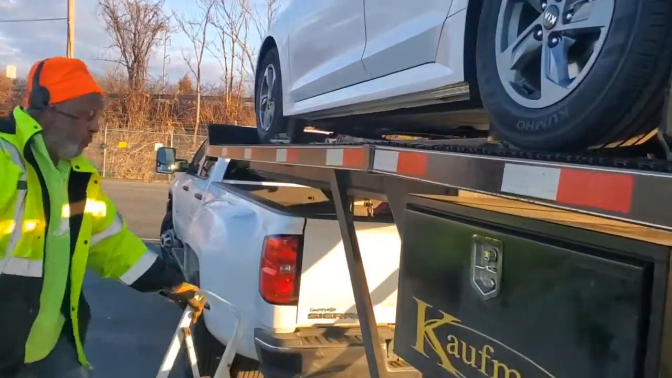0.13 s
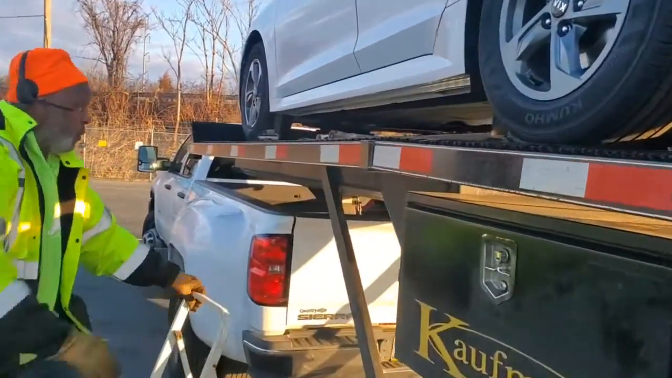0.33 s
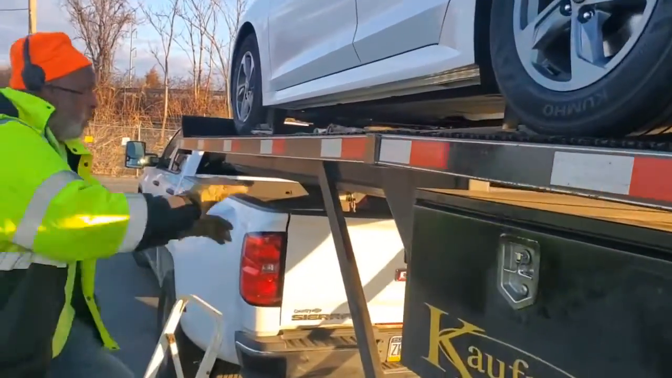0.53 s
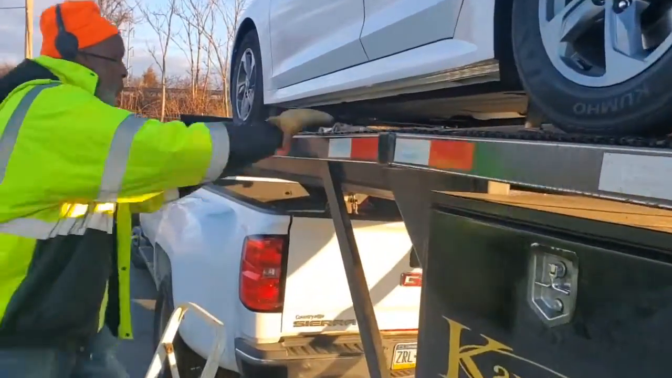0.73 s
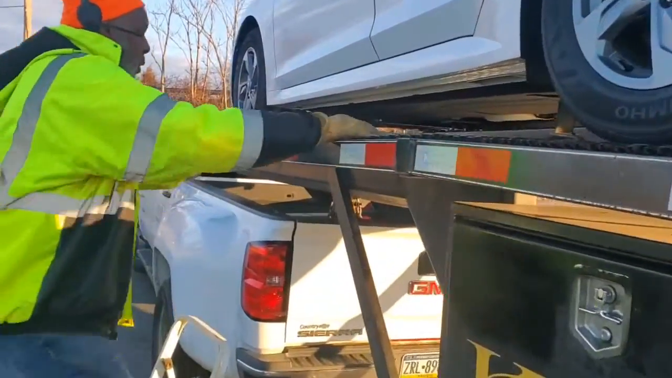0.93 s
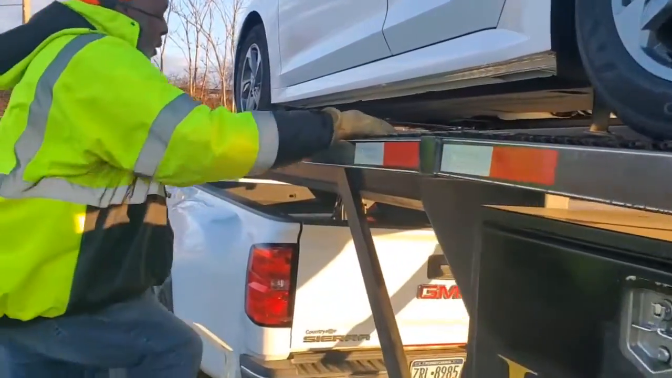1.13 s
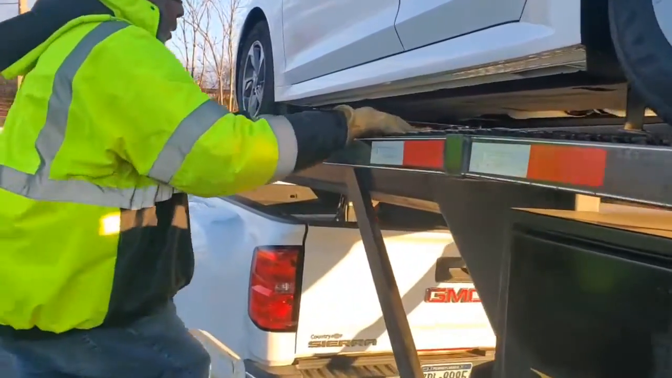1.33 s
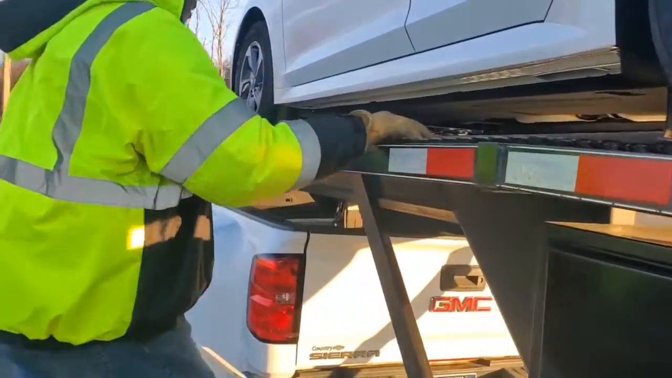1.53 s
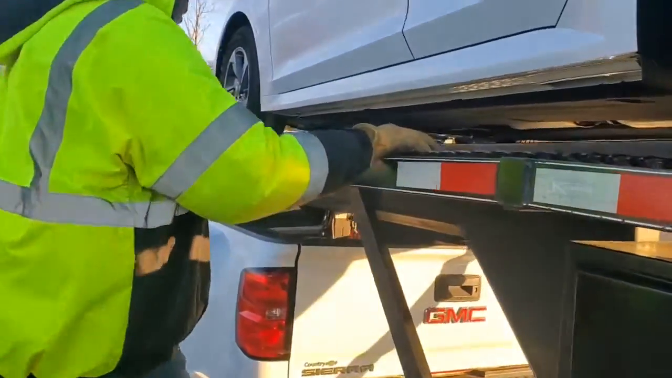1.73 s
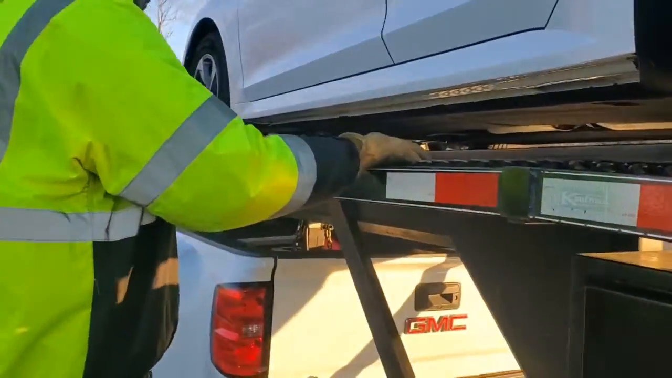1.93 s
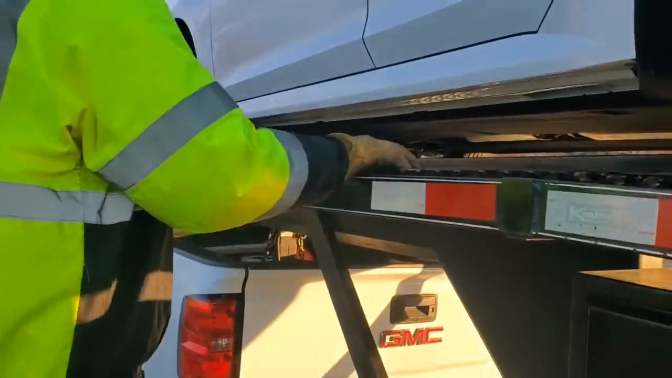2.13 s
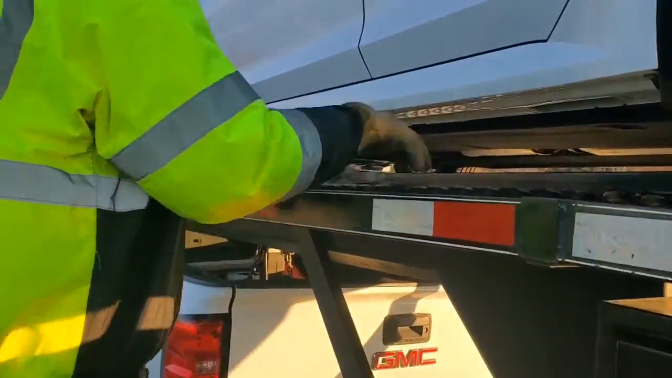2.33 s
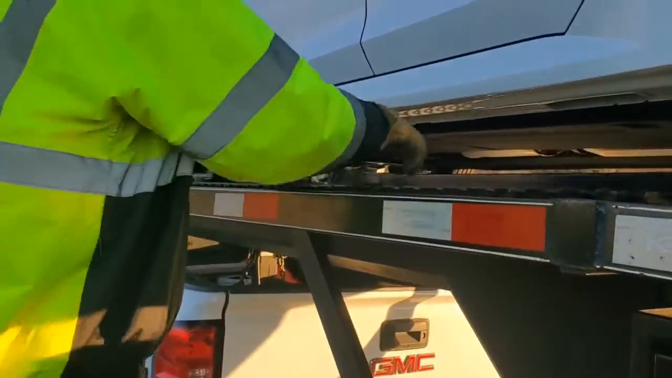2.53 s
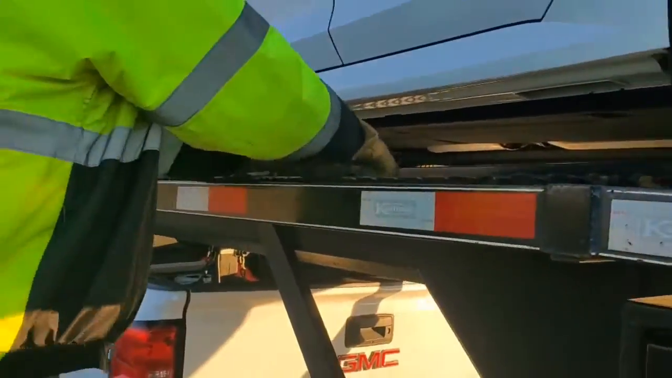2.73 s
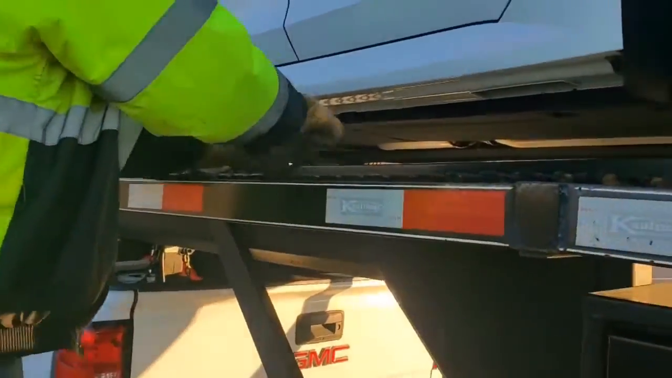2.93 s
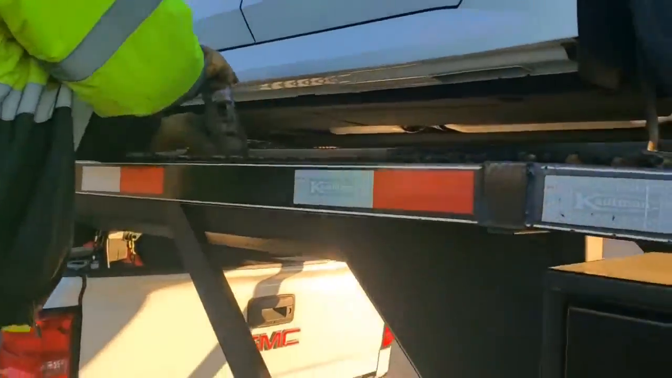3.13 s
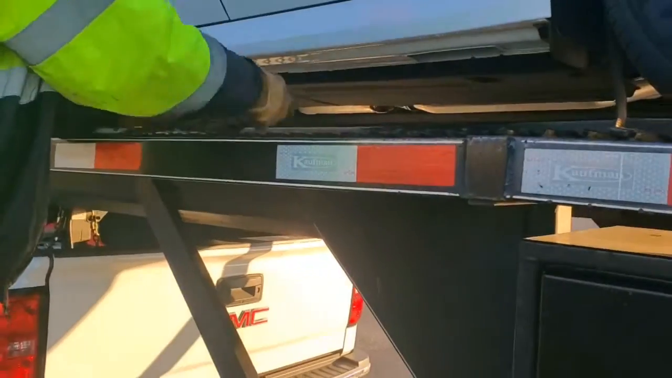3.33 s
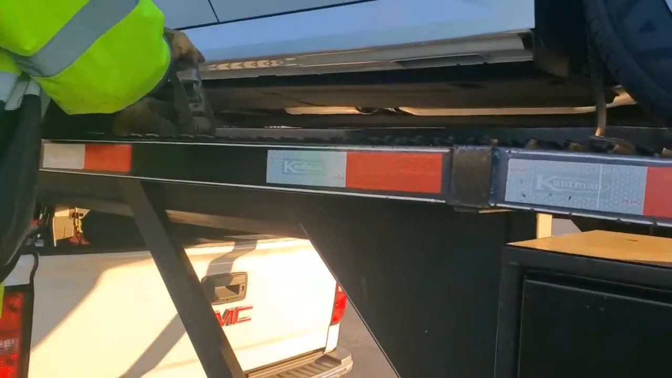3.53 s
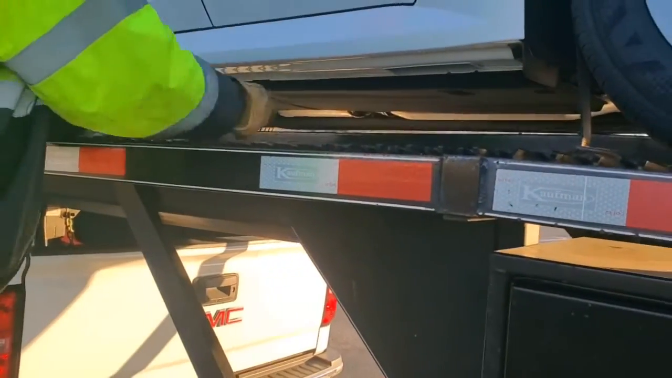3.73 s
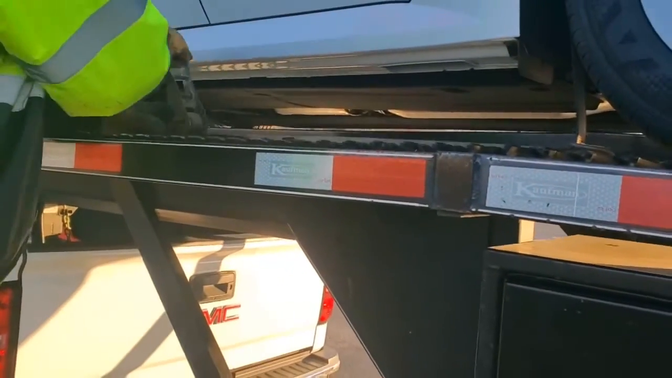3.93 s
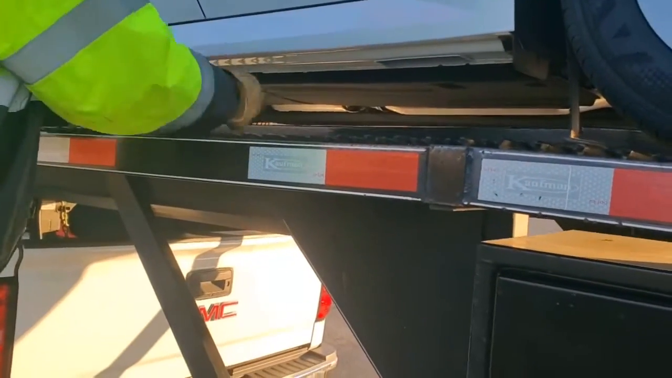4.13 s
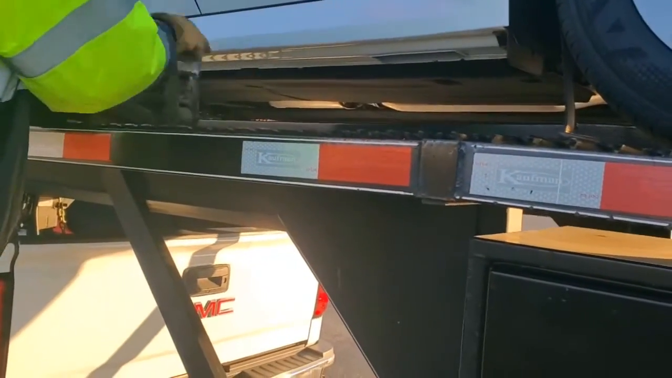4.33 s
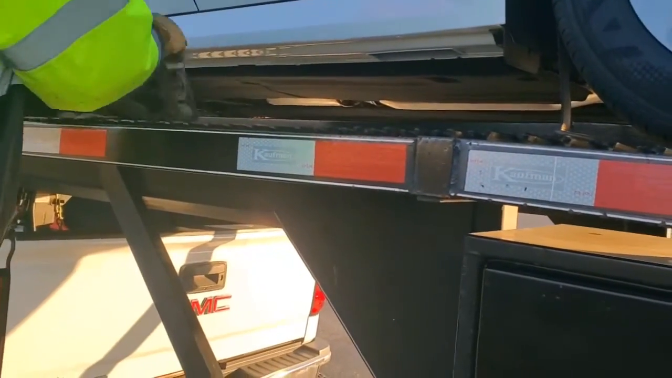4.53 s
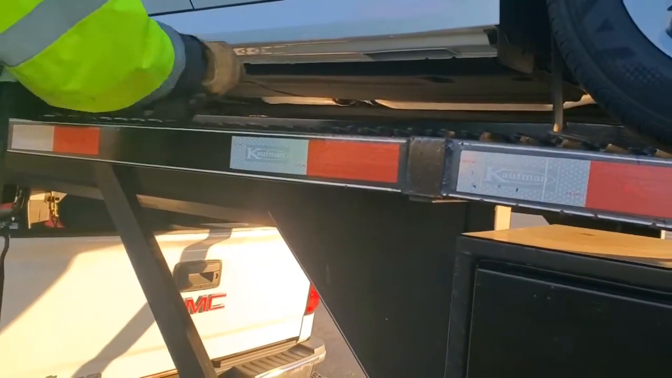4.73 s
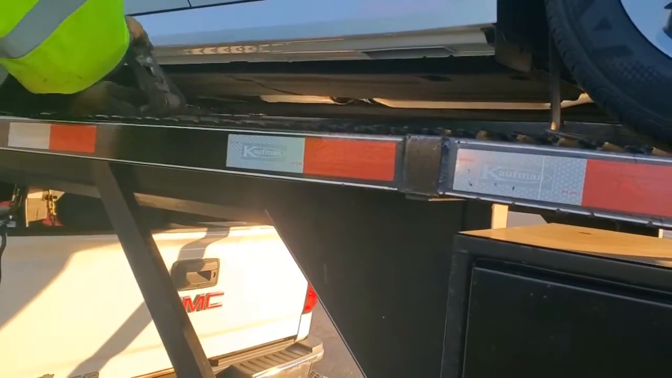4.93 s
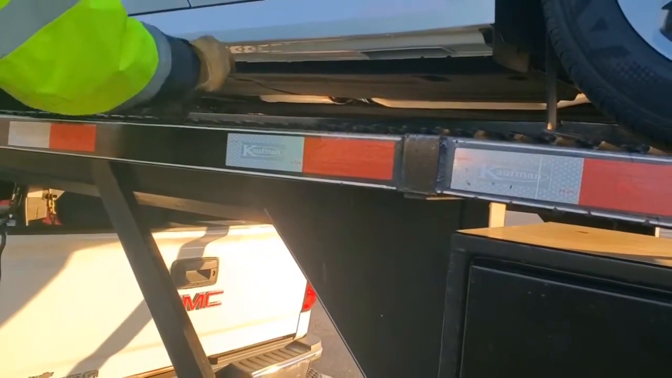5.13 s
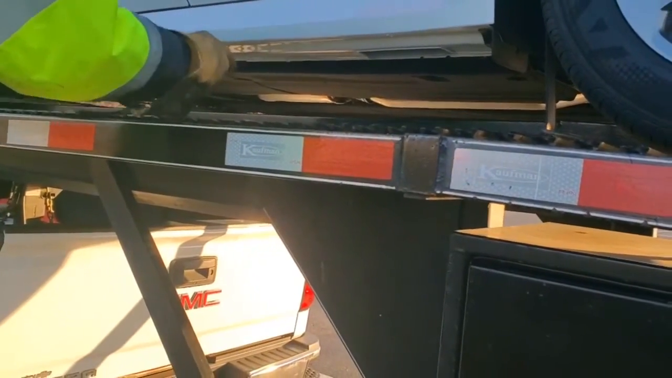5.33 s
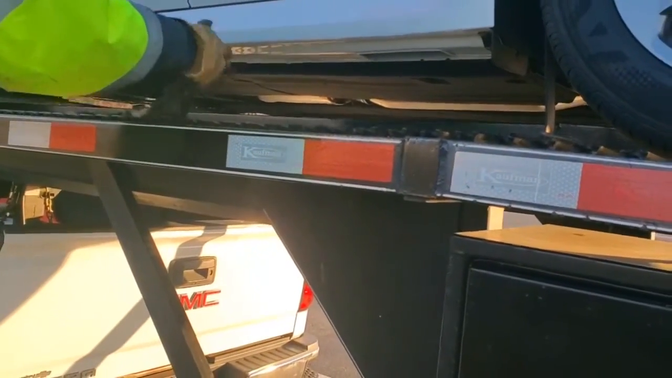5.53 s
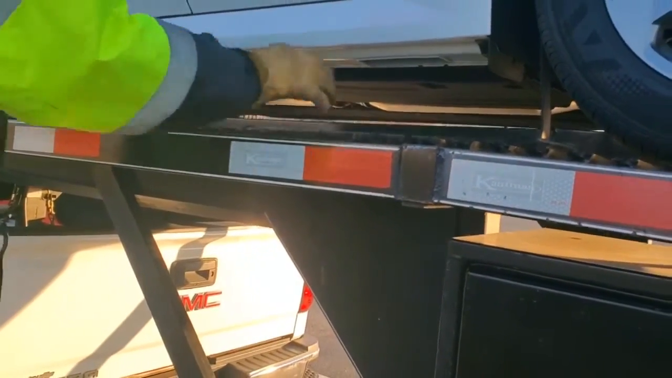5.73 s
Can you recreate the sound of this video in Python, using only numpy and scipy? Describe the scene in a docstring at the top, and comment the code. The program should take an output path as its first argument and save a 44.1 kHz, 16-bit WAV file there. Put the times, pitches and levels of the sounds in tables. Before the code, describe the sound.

Outdoors in low wind, a stool drags with a squeak before a strap ratchet is cranked with sharp clicks and ringing knocks.

```python
"""Outdoors beside a steel car trailer. An aluminium step stool is dragged over asphalt: its feet rasp
and squeak, its frame rings, its legs clack. Then a tie-down ratchet is cranked: ratchet and hook scrape,
knock and rattle on the ringing deck, and the sprung pawl snaps over its teeth.
A work jacket rustles; wind rumbles on the microphone over distant traffic."""
import sys
import numpy as np
from scipy import signal
from scipy.fft import rfft, irfft
from scipy.io import wavfile
from scipy.ndimage import uniform_filter1d

SR = 44100
rng = np.random.default_rng(int(sys.argv[2]) if len(sys.argv) > 2 else 0)


def log_audio(samples):
    """Write samples as a 16-bit WAV file to the path given in sys.argv[1]."""
    # one column per channel
    frames = np.atleast_2d(samples).T
    # limit to full scale, then quantise
    limited = np.clip(frames, -1, 1)
    pcm = np.round(limited * 32767).astype(np.int16)
    wavfile.write(sys.argv[1], SR, pcm)


N = 254456
HIT_N = 24576  # samples per hit
T = np.arange(N) / SR
HIT_T = T[:HIT_N]

# stool shoves (time [s], length [s], level [dB], treble [dB re level])
SHOVES = [(-.008, 0.015, -13.5, -1), (0.041, 0.061, -22.5, -4), (0.108, 0.1, -20, -5),
          (0.216, 0.12, -27.5, -24), (0.408, 0.048, -34.5, -9), (0.452, 0.015, -39.5, -2)]
# stool frame modes (frequency [Hz], bandwidth [Hz], level [dB])
STOOL_MODES = [(733, 61, -4), (1197, 280, 3.5), (1720, 31, -3), (1940, 34, 4), (2224, 35, 9),
               (2390, 66, -2), (2720, 50, -7), (2870, 48, 2), (3370, 59, 7), (4265, 42, 8)]
# grit under the feet (frequency [Hz], level [dB])
GRIT_SPECTRUM = [(120, -53), (200, -6), (435, -13), (748, 0), (1380, -11.5), (1690, -1.5), (2330, -7.5),
                 (2850, 1.5), (7420, -9.5), (11200, -17), (15000, -32)]
# bright crack of stool and pawl (frequency [Hz], level [dB])
CRACK_SPECTRUM = [(1500, -1.5), (3500, 3), (6000, 4.5), (7700, 1.5), (10000, 7.5), (12500, 4.5),
                  (14500, -5), (16000, -9.5)]
# leg clacks (time [s], level [dB], crack [dB re level])
CLACKS = [(.016, -26, 2), (.177, -20, -12), (0.296, -22.5, -14), (.313, -23, -1), (0.534, -49, -14)]
# stool squeaks (time [s], length [s], start pitch [Hz], end pitch [Hz], level [dB])
SQUEAKS = [(.005, 0.045, 1715, 1895, -26.5), (0.121, 0.017, 2940, 1500, -24),
           (0.178, 0.092, 1722, 1735, -31.5), (0.192, 0.058, 2770, 2760, -32),
           (0.257, 0.022, 2610, 2800, -32), (0.43, 0.01, 2220, 2210, -32.5), (0.77, 0.37, 2290, 2360, -66),
           (0.798, 0.3, 2790, 3060, -66)]
# wind strength (time [s], level [dB])
WIND_LEVELS = [(0.0, -40.5), (1.36, -38), (1.6, -33), (3.3, -32.5), (4.3, -35), (5.1, -34.5), (5.6, -35)]
# deep wind rumble (frequency [Hz], level [dB])
RUMBLE_SPECTRUM = [(15, -20), (32, -13), (48, -3), (64, 2), (96, -1), (130, -9), (200, -19), (400, -50),
                   (1600, -90)]
# upper wind rumble (frequency [Hz], level [dB])
STIR_SPECTRUM = [(90, -25), (135, 5.5), (170, 8), (260, 2), (400, -5), (800, -100)]
# wind buffets (time [s], level [dB])
BUFFETS = [(1.667, -21.5), (2.05, -25), (2.708, -21), (2.969, -25), (4.601, -19.5), (5.012, -21.5)]
# far traffic (frequency [Hz], level [dB])
TRAFFIC_SPECTRUM = [(150, -7.5), (350, 4), (650, 3.5), (1000, -1.5), (2000, -8), (4000, -19.5), (8000, -55)]
# jacket cloth (frequency [Hz], level [dB])
CLOTH_SPECTRUM = [(700, -29), (2500, 4.5), (6500, 8.5), (7800, 3), (12000, 4.5), (16000, 0.5)]
# arm reaches (centre [s], sigma [s], level [dB])
REACHES = [(1.05, 0.044, -69), (2.452, 0.4, -61.5)]
# hook and ratchet drags (time [s], length [s], level [dB], clash [dB re level])
SCRAPES = [(1.219, 0.035, -45.5, -6), (2.661, 0.077, -41, -29), (2.718, 0.035, -36.5, -7),
           (2.835, 0.057, -38.5, -13), (3.634, 0.088, -33.5, -5.5), (4.19, 0.1, -33, -8),
           (4.751, 0.04, -38.5, 1), (5.58, 0.048, -41, -21.5)]
# dense deck modes (frequency [Hz], level [dB], t60 [s])
DECK_BANDS = [(146, -6, 0.93), (337, -4.5, 1), (550, -1, 1), (1060, 2, 0.7), (1690, -4, 0.84),
              (2300, -6, 0.62), (4200, -14.5, 0.95), (9050, -26.5, 0.49)]
# clash of steel parts (frequency [Hz], level [dB], t60 [s])
CLASH_BANDS = [(940, -14, 0.142), (2220, 7, 0.51), (4300, 5, 0.38), (7950, -1, 0.3), (11400, -3, 0.32),
               (16000, -10, 0.057)]
# knocks on the deck (time [s], level [dB], clash [dB re level], build-up [s])
KNOCKS = [(1.236, -45.5, 2.5, 0.0014), (1.362, -51, -9, 0), (1.427, -51, 2.5, 0), (2.019, -35, -23, 0),
          (2.074, -35, -28, 0), (2.255, -33.5, -24, 0), (2.754, -29.5, -17, 0), (2.83, -27.5, -22, 0.0011),
          (2.901, -21.5, -19, 0), (3.194, -15.5, -9, 0.0028), (3.298, -14.5, -25, 0.0028),
          (3.335, -16, -11, 0.01), (3.37, -14, -19, 0.0038), (3.427, -12, -7.5, 0.0042),
          (3.712, -11, -8, 0.016), (3.817, -15, -5.5, 0.004), (4.002, -14, -11, 0.0033),
          (4.1, -17.5, -7, 0.019), (4.135, -19.5, -13.5, .006), (4.242, -21.5, -9, 0.005),
          (4.481, -19.5, -8.5, 0.017), (4.614, -23, -11, 0.012), (4.656, -13, -12, 0.014),
          (5.002, -13.5, -9, 0.013), (5.102, -23.5, -0.5, 0.0016), (5.174, -26.5, 2, 0.0036)]
# clearest deck modes (frequency [Hz], t60 [s], level [dB])
DECK_MODES = [(420, .9, 4), (448, .8, 3), (538, .6, 5), (651, .6, 6), (824, .6, 5), (964, .5, 7),
              (1010, .3, 5), (1110, .4, 2), (1233, .3, 2), (1663, .5, -1), (1997, .5, -2), (2400, .5, 0),
              (4450, .35, -7)]
# steel grinding under load (frequency [Hz], level [dB])
GRIND_SPECTRUM = [(450, -35), (1000, 7.5), (2200, -7.5), (5000, -24)]
# modes of the beam under the ratchet (frequency [Hz])
BEAM_HZ = [450, 560, 680, 830, 990, 1200, 1500]
# hook modes (frequency [Hz])
HOOK_HZ = [1863, 2358, 3112, 3521, 4091, 5103]
# pawl snaps (time [s], level [dB], favoured mode [Hz], its ring [dB re level])
SNAPS = [(3.0399, -5, 12600, -15), (3.0852, -3.5, 11650, -12), (3.265, -7, 14490, -11),
         (3.318, -10, 11650, -10), (3.6632, -23.5, 11650, -16), (3.711, -7, 14490, 5.5),
         (4.057, -22, 11650, -19), (4.111, -11, 13250, -7), (4.361, -10.5, 11650, -13),
         (4.4424, -24, 8550, -9), (4.4874, -35, 14490, -1), (4.613, -7, 14490, 5.5),
         (4.656, -10.5, 13250, -7), (4.8752, -6.5, 11650, 0.5), (4.929, -15.5, 11650, -17),
         (5.102, -8.5, 13250, -5)]
# pawl and spring modes (frequency [Hz], t60 [s], level [dB])
PAWL_MODES = [(5800, .06, -6), (6900, .06, -6), (8550, .05, -6), (10000, .05, -6), (11650, .045, -2),
              (12600, .04, -3), (13250, .04, -3), (14490, .04, -3)]
# ratchet frame (frequency [Hz], level [dB], t60 [s])
RATCHET_BANDS = [(686, -17, 0.14), (2360, 4.5, 0.22), (4400, 8.5, 0.18), (7260, 1, 0.14)]
# left-right likeness (frequency [Hz], correlation [-])
CORRELATION = [(40, 0.89), (130, 0.24), (300, 0.67), (750, 0.7), (1400, 0.09), (2800, 0.28), (5000, 0.17),
               (12000, 0.038)]


def undb(db):
    """Decibels to gain."""
    return 10 ** (np.asarray(db) / 20)


def unit(x):
    """Scale to rms 1."""
    return x / np.sqrt(np.mean(x ** 2))


def unit_peak(x, size=256):
    """Scale the loudest window to rms 1."""
    return x / np.sqrt(uniform_filter1d(np.mean(x ** 2, axis=0), size).max())


def at_hz(hz, rows):
    """Interpolate a table's second column over log frequency."""
    rows = np.array(rows)
    return np.interp(np.log(hz + 1e-9), np.log(rows[:, 0]), rows[:, 1])


def noise(spectrum, size=HIT_N):
    """Shaped stereo noise, rms 1; the sides are nearly unrelated in the treble."""
    hz = np.fft.rfftfreq(size, 1 / SR)
    alike = at_hz(hz, CORRELATION)
    mid, side = rfft(rng.standard_normal((2, size))) * np.sqrt([1 + alike, 1 - alike])
    return unit(irfft(np.array([mid + side, mid - side]) * undb(at_hz(hz, spectrum)), size))


def wander(rate_hz):
    """Random curve, spread near 1."""
    return np.interp(T * rate_hz, np.arange(1024), rng.standard_normal(1024))


def bell(centre_s, sigma_s):
    """Gaussian rise and fall."""
    return np.exp(-.5 * ((T - centre_s) / sigma_s) ** 2)


def fade(t60_s):
    """Free decay."""
    return np.exp(-np.log(1000) * HIT_T / max(t60_s, 1e-3))


def grains(rate_hz, t60_s, size=HIT_N):
    """Jagged envelope of tiny uneven catches, rms 1."""
    catches = (rng.random(size) < rate_hz / SR) * rng.exponential(1, size)
    power = irfft(rfft(catches) * rfft(fade(t60_s) ** 2, size), size)
    return unit(np.sqrt(np.abs(power)))


def detuned(hz, spread):
    """Random relative pitch offset."""
    return hz * (1 + spread * rng.standard_normal())


def ring(modes, width=1, size=HIT_N):
    """Decaying sine modes; width scales the left-right phase gap."""
    out = 0
    for hz, t60_s, db in modes:
        gap_rad = width * np.arccos(at_hz(hz, CORRELATION)) * rng.choice([-.5, .5])
        phase = rng.uniform(0, 2 * np.pi) + np.array([[gap_rad], [-gap_rad]])
        out = out + undb(db) * fade(t60_s)[:size] * np.sin(2 * np.pi * hz * HIT_T[:size] + phase)
    return unit_peak(out)


def wash(bands, bloom_t60_s=0, bloom_hz=490):
    """Dense modes as decaying noise bands; in a large plate those below bloom_hz swell slowest."""
    source = rfft(noise(bands))
    hz = np.fft.rfftfreq(HIT_N, 1 / SR)
    centres_hz = [row[0] for row in bands]
    out = 0
    for pick, (centre_hz, _, t60_s) in zip(np.eye(len(bands)), bands):
        band = irfft(source * at_hz(hz, list(zip(centres_hz, pick))), HIT_N)
        swell = 1 - fade(bloom_t60_s * min(bloom_hz / centre_hz, 1) ** 2)
        out = out + band * swell * fade(t60_s)
    return unit_peak(out)


def excite(body, force):
    """Drive a stereo impulse response, scaled to unit energy per side."""
    return signal.fftconvolve(force[None], body / np.sqrt(np.sum(body ** 2) / 2), axes=1)


def add(out, time_s, sound):
    """Mix a sound in at a time."""
    start = max(int(time_s * SR), 0)
    out[:, start:start + sound.shape[1]] += sound[:, :out.shape[1] - start]


def shove(time_s, length_s, attack_s=.015, sag_db_per_s=33.5, release_db_per_s=351):
    """Force envelope: the feet bite, ease while sliding, stop."""
    age_s = np.maximum(T - time_s, 0)
    fall_db = sag_db_per_s * age_s + release_db_per_s * np.maximum(age_s - length_s, 0)
    return np.minimum(age_s / attack_s, 1) * undb(-fall_db)


def stool_drag(frame_db=-3, rasp_db=-1, crunch_db=-3, flex_s=4e-5):
    """Feet catch on asphalt grains; the slips rasp and ring the hollow frame, which wavers as it flexes."""
    force = sum(undb(db) * shove(s, length_s) for s, length_s, db, _ in SHOVES)
    treble = sum(undb(db + treble_db) * shove(s, length_s) for s, length_s, db, treble_db in SHOVES)
    grain = grains(rate_hz=2800, t60_s=.013, size=N)
    slips = rng.standard_normal(N) * grain * force * undb(frame_db)
    modes = [(hz, np.log(1000) / np.pi / width_hz, db + 10 * np.log10(width_hz))
             for hz, width_hz, db in STOOL_MODES]
    frame = excite(ring(modes), slips)[:, :N]
    warped_s = T + flex_s * wander(69.2)
    frame = np.array([np.interp(warped_s, T, side) for side in frame])
    rasp = noise(GRIT_SPECTRUM, N) * force * undb(rasp_db)
    crunch = noise(CRACK_SPECTRUM, N) * treble * undb(crunch_db)
    return (rasp + crunch) * grain + frame


def stool_squeaks(waver=.0355, steady_after_s=.026):
    """Slips lock on to a pitch; longer squeaks are steadier."""
    out = np.zeros((2, N))
    for time_s, length_s, start_hz, end_hz, db in SQUEAKS:
        progress = np.linspace(0, 1, int(length_s * SR))
        wobble = waver * min(1, steady_after_s / length_s) * wander(175)[:len(progress)]
        hz = (start_hz + (end_hz - start_hz) * progress) * (1 + wobble)
        phase = 2 * np.pi * np.cumsum(hz) / SR + np.array([[0], [1]])
        envelope = np.sqrt(2 * np.abs(np.sin(np.pi * progress)))
        add(out, time_s, undb(db) * envelope * np.sin(phase))
    return out


def stool_clacks(t60_s=.1):
    """The legs clack in short noise bursts."""
    out = np.zeros((2, N))
    for time_s, db, crack_db in CLACKS:
        clack = noise(GRIT_SPECTRUM) + undb(crack_db) * noise(CRACK_SPECTRUM)
        add(out, time_s, undb(db) * clack * fade(t60_s))
    return out


def wind(rumble_db=-1, stir_db=-10.5, flutter_db=6, lull_db=3, buffet_sigma_s=.0065):
    """Fluttering rumble; each large eddy shoves the microphone for a few cycles."""
    gust_db = np.interp(T, *np.transpose(WIND_LEVELS))
    gust_db += flutter_db * np.tanh(wander(36)) + lull_db * np.tanh(wander(11))
    rumble = undb(rumble_db) * noise(RUMBLE_SPECTRUM, N)
    stir = undb(stir_db) * noise(STIR_SPECTRUM, N)
    out = undb(gust_db) * (rumble + stir)
    for time_s, db in BUFFETS:
        hz = rng.uniform(79, 104)
        phase = 2 * np.pi * hz * (T - time_s) + rng.uniform(-.99, 1, (2, 1))
        out += undb(db) * bell(time_s, buffet_sigma_s) * np.sin(phase)
    return out


def traffic(base_db=-48, swell_db=4.5):
    """Distant road noise that swells once."""
    swell = bell(centre_s=2.25, sigma_s=.22)
    return noise(TRAFFIC_SPECTRUM, N) * undb(base_db + swell_db * swell + wander(12))


def jacket(floor_db=-64):
    """Cloth hisses faintly and rustles as the arm reaches out."""
    motion = undb(floor_db) + sum(undb(db) * bell(s, sigma_s) for s, sigma_s, db in REACHES)
    return noise(CLOTH_SPECTRUM, N) * motion * undb(wander(26))


def hook_scrapes(catch_rate_hz=280, damping_t60_s=.1):
    """Hook and ratchet drag over the deck; irregular catches ring the steel."""
    out = np.zeros((2, N))
    for time_s, length_s, db, clash_db in SCRAPES:
        caught = (rng.random(HIT_N) < catch_rate_hz / SR) * (HIT_T < length_s)
        catches = caught * rng.standard_normal(HIT_N)
        catches *= np.sqrt(length_s * SR / (np.sum(catches ** 2) + 1e-9))
        for bands, part_db in ((DECK_BANDS, db), (CLASH_BANDS, db + clash_db)):
            add(out, time_s, undb(part_db) * excite(wash(bands) * fade(damping_t60_s), catches))
    return out


def rattle(body, bounce_s, rise_s, count=24, firm_blow=3.76):
    """Light touches lead up to a firm blow on a body; weakening bounces follow."""
    lags = rng.gamma(2, .5, count)
    strengths = rng.choice([-1, 1], count) * rng.uniform(.52, 1, count)
    lags[0], strengths[0] = 0, firm_blow
    touches = np.append(0, rng.uniform(0, 1, count // 6))
    times_s = np.append(rise_s + lags * bounce_s, touches * rise_s)
    strengths = np.append(strengths * np.exp(-.3 * lags), rng.choice([-1, 1], len(touches)))
    blows = np.zeros(HIT_N)
    np.add.at(blows, np.minimum(times_s * SR, HIT_N - 1).astype(int), strengths)
    return unit_peak(excite(body, blows)[:, :HIT_N], size=1024)


def deck_knocks(plate_db=-10, clash_trim_db=-2.5, max_chatter_s=.012, max_clash_s=.0076,
                max_damping_t60_s=.78, contact_db=-2, contact_t60_s=.038):
    """Ratchet and hook strike the steel deck; harder knocks chatter and ring longer."""
    out = np.zeros((2, N))
    for time_s, db, clash_db, rise_s in KNOCKS:
        modes = [(detuned(hz, .0053), t60_s, mode_db + 3 * rng.standard_normal())
                 for hz, t60_s, mode_db in DECK_MODES]
        plate = wash(DECK_BANDS, bloom_t60_s=.073) + undb(-6) * ring(modes)
        steel = wash(CLASH_BANDS)
        force = np.interp(db, [-28, -12], [.3, 1])
        # strap and hand soak up part of the ring, most of it after a light touch
        free_share = .74 * force
        envelope = free_share + (1 - free_share) * fade(max_damping_t60_s * force)
        envelope += undb(contact_db) * fade(contact_t60_s)
        knock = undb(plate_db) * rattle(plate * envelope, max_chatter_s * force, rise_s)
        buzz = grains(rate_hz=1000, t60_s=.025)
        clash = undb(clash_db + clash_trim_db) * rattle(steel * envelope, max_clash_s * force, rise_s)
        add(out, time_s, undb(db) * (knock + clash * buzz))
        add(out, time_s + rise_s, undb(db) * force * load_bite())
        add(out, time_s + rise_s, undb(db) * hook_jiggle(plate))
    return out


def load_bite(grind_db=-12, grind_t60_s=.16, clunk_db=-10, top_mode_t60_s=.088):
    """The load comes on: steel grinds on steel, the deck's beam clunks."""
    crunch = grains(rate_hz=800, t60_s=.012)
    grind = undb(grind_db) * noise(GRIND_SPECTRUM) * crunch * fade(grind_t60_s)
    modes = [(detuned(hz, .06), top_mode_t60_s * BEAM_HZ[-1] / hz, 3 * rng.standard_normal())
             for hz in BEAM_HZ]
    return grind + undb(clunk_db) * ring(modes, width=.29)


def hook_jiggle(plate, span_s=.14, fall_db=17, clack_db=-10, clack_t60_s=.056,
                clink_db=-15, clink_t60_s=.061, count=4):
    """The loose hook lands in weakening clacks; each contact shifts and remixes its modes."""
    out = np.zeros((2, HIT_N))
    for lag in (np.arange(count) + rng.random(count)) / count:
        modes = [(detuned(hz, .06), clink_t60_s, 5 * rng.standard_normal()) for hz in HOOK_HZ]
        add(out, span_s * lag, undb(clack_db - fall_db * lag) * plate * fade(clack_t60_s))
        add(out, span_s * lag, undb(clink_db - fall_db * lag) * ring(modes, size=4096))
    return out


def pawl_snaps(trim_db=-4, modes_db=-7, frame_db=-15, deck_db=-22, scatter_db=-27, detune=.0185,
               rise_t60_s=.015, crack_t60_s=.02, ring_t60_s=.041, scatter_t60_s=.11):
    """The sprung pawl drops on a tooth: a crack, high rings, scatter off the deck and the car above."""
    out = np.zeros((2, N))
    for time_s, db, favoured_hz, favoured_db in SNAPS:
        crack = noise(CRACK_SPECTRUM) * (fade(crack_t60_s) + undb(scatter_db) * fade(scatter_t60_s))
        # each tooth seats the pawl differently and favours one mode, which splits
        modes = [(detuned(hz, detune), t60_s, mode_db) for hz, t60_s, mode_db in PAWL_MODES]
        split = [(favoured_hz, ring_t60_s, 0)]
        split += [(detuned(favoured_hz, detune), ring_t60_s, -6) for _ in range(3)]
        tone = undb(modes_db) * ring(modes) + undb(favoured_db) * ring(split, width=0)
        body = undb(frame_db) * wash(RATCHET_BANDS) + undb(deck_db) * wash(DECK_BANDS)
        snap = unit_peak(unit_peak(crack) + tone) + body
        add(out, time_s, undb(db + trim_db) * snap * (1 - fade(rise_t60_s)))
    return out


def scene(pan_db=.62, right_delay_s=3.6 / SR):
    """The work is slightly left, so that side is earlier and louder."""
    stool = stool_drag() + stool_clacks() + stool_squeaks()
    left, right = stool + pawl_snaps() + deck_knocks() + hook_scrapes()
    delay = np.exp(-2j * np.pi * np.fft.rfftfreq(N, 1 / SR) * right_delay_s)
    right = irfft(rfft(right) * delay, N)
    work = np.array([left * undb(pan_db), right * undb(-pan_db)])
    return work + wind() + traffic() + jacket()


def record(dry, cutoff_hz=16050):
    """Clip at full scale, then low-pass."""
    lowpass = signal.ellip(10, .2, 70, cutoff_hz, fs=SR, output="sos")
    return signal.sosfilt(lowpass, np.clip(dry, -1, 1))


dry = scene()
out = record(dry)
log_audio(out)
```